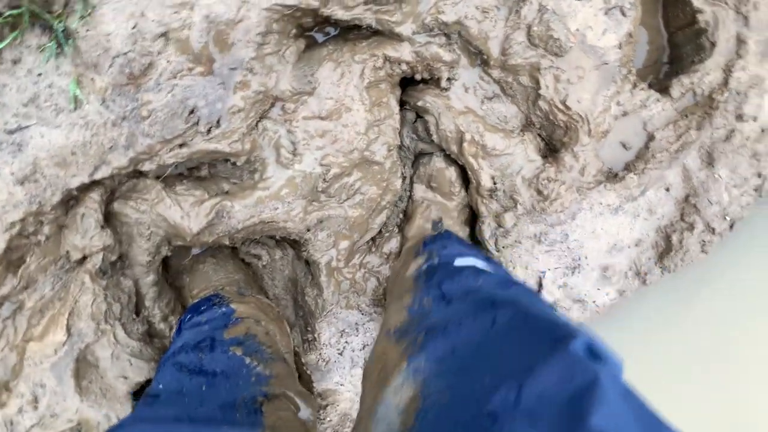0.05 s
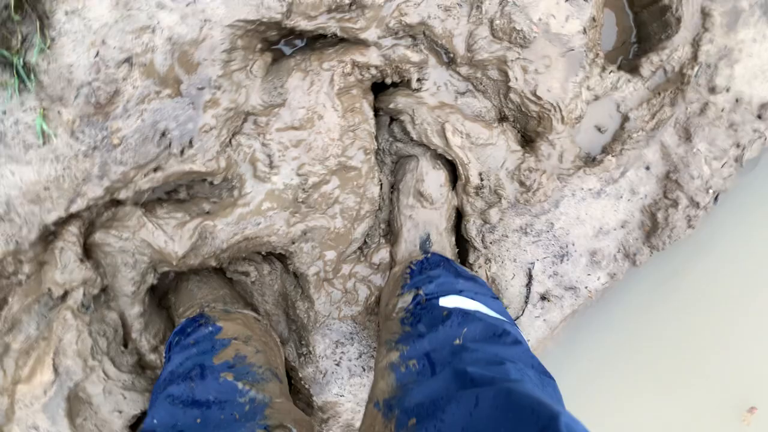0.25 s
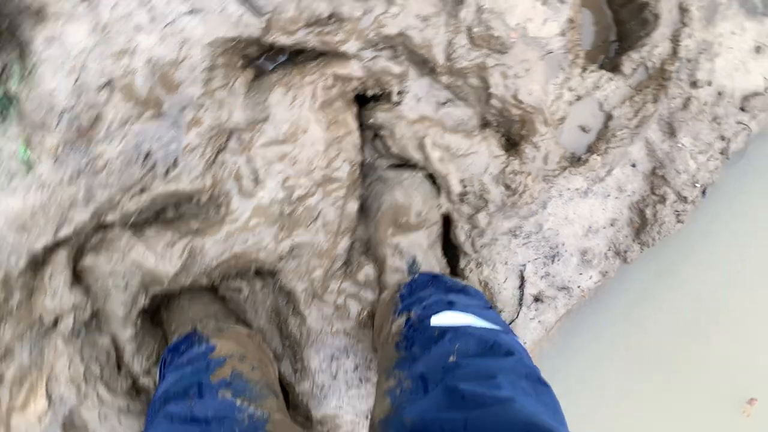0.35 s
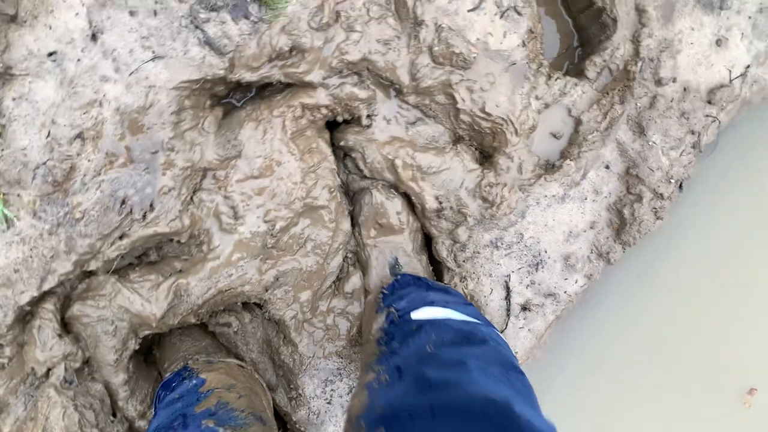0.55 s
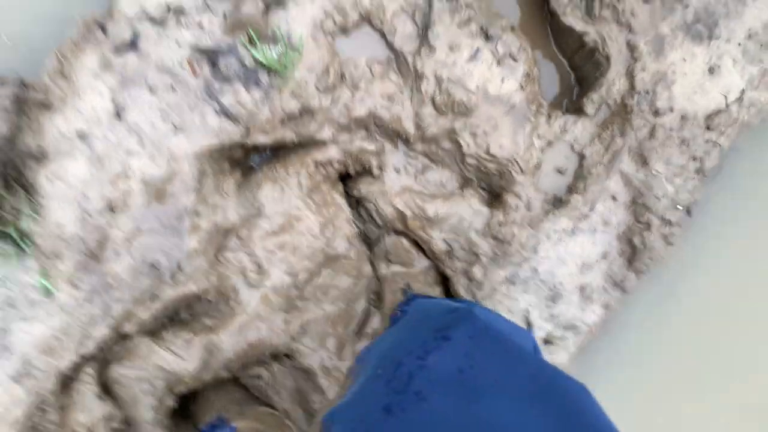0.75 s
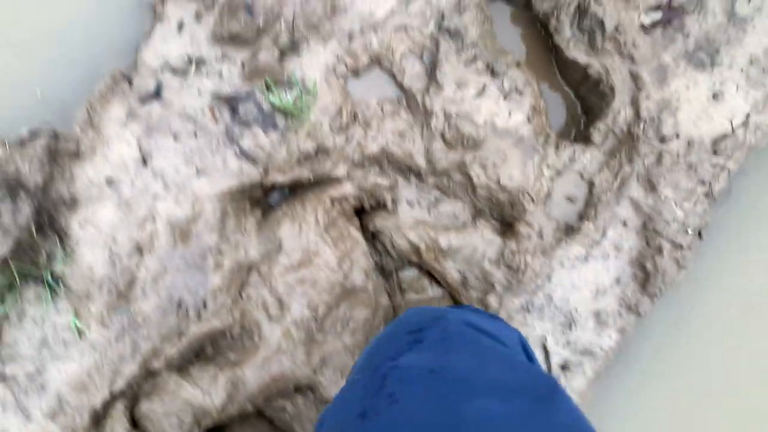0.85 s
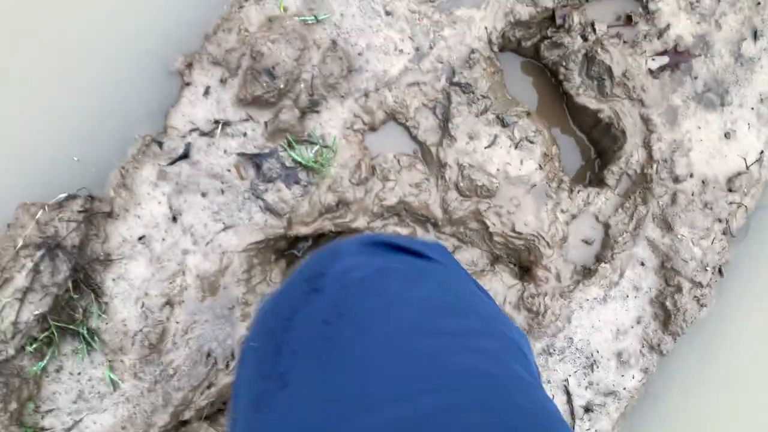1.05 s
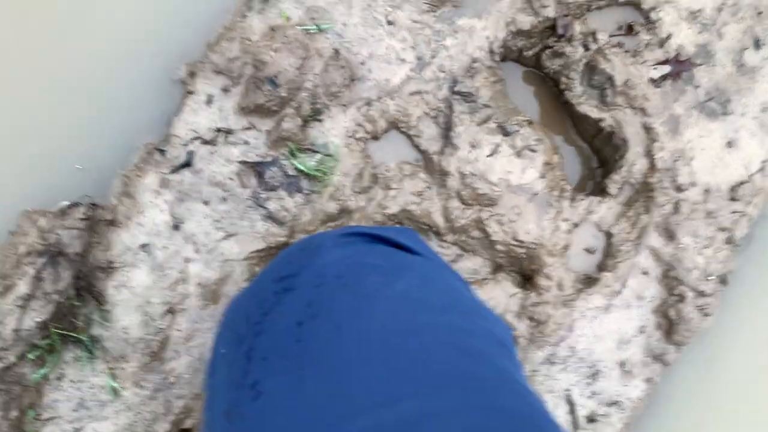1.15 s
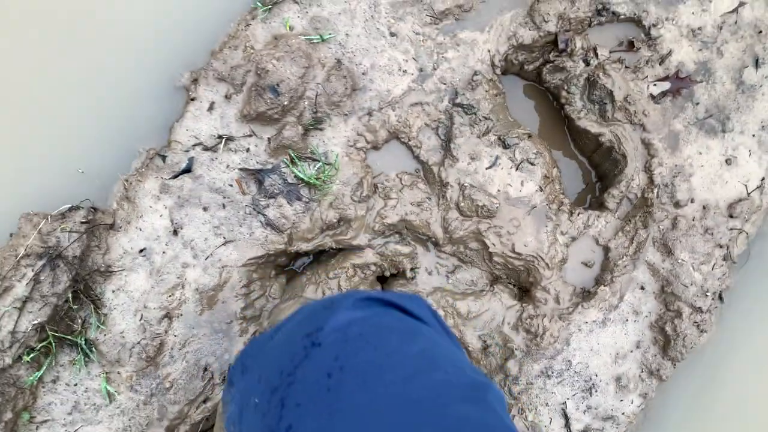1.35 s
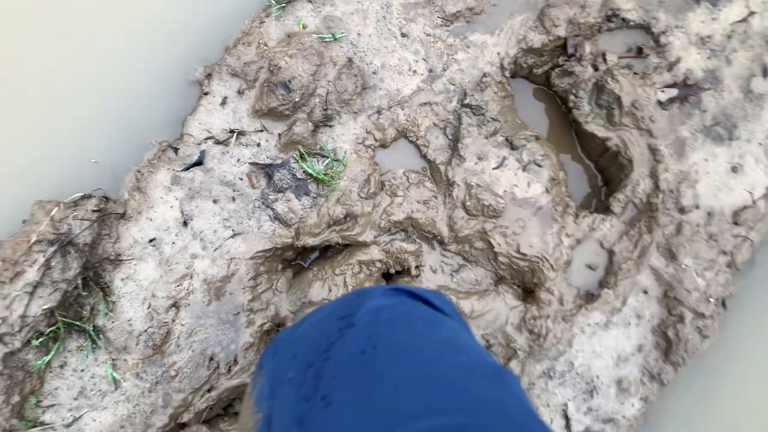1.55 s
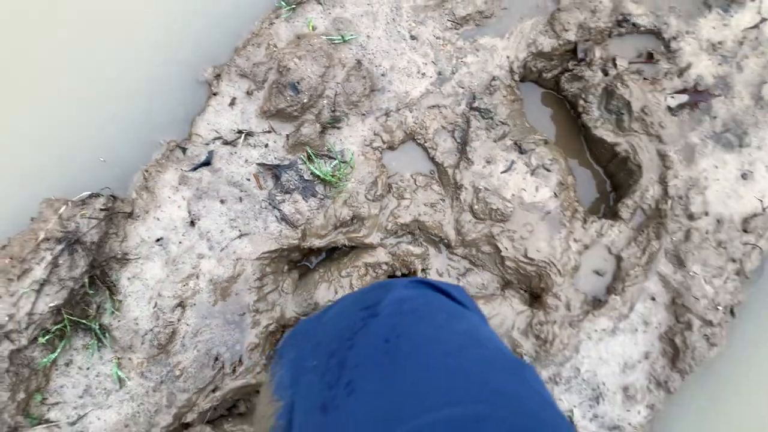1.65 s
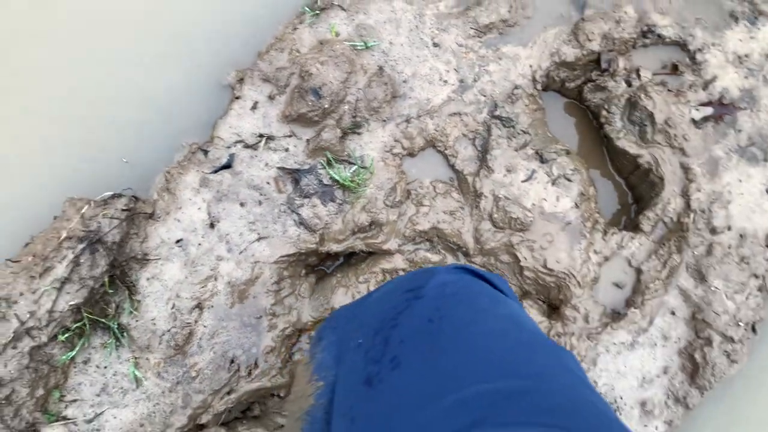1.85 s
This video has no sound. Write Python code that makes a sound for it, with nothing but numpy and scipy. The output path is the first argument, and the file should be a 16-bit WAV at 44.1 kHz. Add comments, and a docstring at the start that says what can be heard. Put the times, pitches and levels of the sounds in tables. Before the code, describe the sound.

A boot squelches through deep wet mud, close by outdoors. At about 0.35 seconds it tears free with a wet hiss, clicks and a thud. Waterproof trousers rustle as the leg swings, and around 0.8 to 0.9 seconds the boot squishes down with small gulps. From 1.2 to 1.5 seconds come dull thuds and wind buffets on the microphone. Tiny bubbles pop throughout over low rumble, fading by 1.9 seconds.

```python
"""Outdoors in deep wet mud: one step in rubber boots, close to a hand-held microphone.
One boot tears loose with a wet hiss of snapping mud threads, swings past and squelches down,
squeezing out slurry and gulps of air. The footfalls thud and air buffets the microphone.
Waterproof trousers rustle, small bubbles pop in the mud, and a faint hush lies far behind."""
import sys
import numpy as np
from scipy import signal
from scipy.fft import rfft, irfft
from scipy.io import wavfile
from scipy.ndimage import uniform_filter1d

SR = 44100
rng = np.random.default_rng(int(sys.argv[2]) if len(sys.argv) > 2 else 0)


def wav_out(sig):
    """Save sig, one row per channel (or a flat mono array), as 16-bit PCM at SR to the path in sys.argv[1]."""
    wavfile.write(sys.argv[1], SR, np.round(np.clip(np.atleast_2d(sig).T, -1, 1) * 32767).astype(np.int16))


N = 83790
T = np.arange(N) / SR
CUTOFF_HZ = 15450
MUD_GRAINS_PER_S, MUD_SPREAD_DB = 3000, 3.5


def from_db(db):
    """Decibels to gain."""
    return 10 ** (np.asarray(db) / 20)


def unit_power(x):
    """Scale to an RMS of one."""
    return x / np.sqrt(np.mean(x ** 2) + 1e-20)


def in_time(rows):
    """Read a (time, value) curve at every sample."""
    return np.interp(T, *np.transpose(rows))


def at_hz(points, hz):
    """Read a (frequency, value) curve on a log-frequency axis."""
    frequency, value = np.transpose(points)
    return np.interp(np.log(hz), np.log(frequency), value)


def pan(db):
    """Left and right gains for a level difference; negative leans right."""
    return from_db(np.array([[db], [-db]]) / 2)


def band(x, low_hz, high_hz, order=2):
    """Butterworth band-pass."""
    sos = signal.butter(order, [low_hz, min(high_hz, SR / 2 - 1)], "band", fs=SR, output="sos")
    return signal.sosfilt(sos, x + 1e-18)


def steady(x, span_s):
    """Even out the swells of a noise that are slower than the span."""
    power = np.abs(signal.hilbert(x)) ** 2 / 2
    return x / np.sqrt(uniform_filter1d(power, max(int(span_s * SR), 1)) + 1e-12)


def swell(peak_s, attack_s, release_s):
    """A rounded rise and fall about a peak."""
    width_s = np.where(T < peak_s, attack_s, release_s)
    return np.exp(-(np.abs(T - peak_s) / width_s) ** 2.6)


def grains(per_s=MUD_GRAINS_PER_S, spread_db=MUD_SPREAD_DB):
    """Four unrelated streams of tiny clicks of uneven size."""
    size = from_db(spread_db * np.minimum(rng.exponential(1, (2, 2, N)), 4))
    return size * rng.choice([-1, 1], (2, 2, N)) * (rng.random((2, 2, N)) < per_s / SR)


def coloured(streams, spectrum, direct):
    """Shape four streams into stereo by third octaves; direct sound is more alike in both channels."""
    # diffuse sound at the two microphone ports: (frequency [Hz], left-right likeness [0-1])
    likeness = [(100, 0.91), (250, 1), (700, 0.58), (1400, 0.12), (3000, 0.097), (10000, 0.093)]
    # lean of the stereo image: (frequency [Hz], left minus right [dB])
    balance = [(200, -6.5), (700, -1.5), (1400, -3.5), (3000, -2.5), (8000, -1.5)]
    edges_hz = 140 * 2 ** (np.arange(22) / 3)
    out = 0
    for k, (low, high) in enumerate(zip(edges_hz, edges_hz[1:])):
        mid, side = band(streams[k % 2], low, high, order=3)
        hz = np.sqrt(low * high)
        alike = np.clip(direct + (1 - direct) * at_hz(likeness, hz), 0, 1)
        pair = np.sqrt(1 + alike) * mid + np.sqrt(1 - alike) * side * [[1], [-1]]
        out = out + from_db(at_hz(spectrum, hz)) * pan(at_hz(balance, hz)) * pair
    return unit_power(out)


def from_left(pair, lag_s=0.00045, above_hz=1900):
    """Treble from the left reaches the right microphone port late."""
    hz = np.arange(N // 2 + 1) * SR / N
    delay = np.exp(-2j * np.pi * hz * lag_s * (hz > above_hz))
    return np.array([pair[0], irfft(rfft(pair[1]) * delay, N)])


def hush():
    """Smooth outdoor air, far from the microphone."""
    # colour of the air: (frequency [Hz], relative density [dB])
    spectrum = [(230, 15), (340, -6), (900, -1), (2000, -11), (4400, -17.5), (5500, -48), (8000, -27),
                (15000, -28)]
    # its slow fall and rise: (time [s], level [dB])
    levels = [(0, -55.5), (.7, -69.5), (1.3, -72), (1.6, -55.5), (1.9, -61)]
    air = coloured(rng.standard_normal((2, 2, N)), spectrum, direct=0.098)
    return from_db(in_time(levels)) * from_left(air)


def rumble(gain_db=3.5):
    """Low wind and handling noise on the microphone, the same in both channels."""
    # colour of the rumble: (frequency [Hz], relative density [dB])
    spectrum = [(20, -27.5), (35, -9.5), (50, 2), (75, -0.5), (110, -11), (170, -15.5), (250, -25.5),
                (340, -37.5), (600, -54.5)]
    # surges of wind and handling: (time [s], relative level [dB])
    levels = [(0, -52.5), (.2, -49.5), (.25, -40.5), (.32, -60), (.38, -33.5), (.45, -38), (.57, -36),
              (.62, -49), (.75, -46.5), (.83, -33.5), (.92, -33.5), (.96, -48.5), (1.02, -37), (1.16, -44),
              (1.27, -32), (1.46, -34), (1.53, -40), (1.57, -52.5), (1.61, -45.5), (1.75, -56),
              (1.785, -47), (1.9, -64.5)]
    hz = np.maximum(np.arange(N // 2 + 1) * SR / N, 1)
    noise = irfft(rfft(rng.standard_normal(N)) * from_db(at_hz(spectrum, hz)), N)
    return from_db(in_time(levels) + gain_db) * steady(band(noise, 21, 400), span_s=0.046)


def buffets(low_hz=104.5, attack_s=0.0072, release_s=0.0071, split_hz=410, side_db=-4.5):
    """Short eddies right at the microphone; above the split its two ports feel different ones."""
    # puffs of air: (start [s], length [s], level [dB], top edge [Hz])
    puffs = [(0.215, 0.022, -43, 258), (0.355, .022, -31.5, 464), (0.379, 0.04, -34, 291),
             (0.47, 0.02, -41.5, 340), (0.766, 0.048, -41, 345), (0.81, 0.12, -43.5, 250),
             (1.238, 0.011, -34.5, 320), (1.283, 0.0073, -32, 338), (1.337, 0.03, -29.5, 486),
             (1.37, 0.04, -23.5, 422), (1.455, 0.034, -30.5, 418), (1.487, 0.034, -34.5, 350)]
    treble_tilt = signal.butter(1, 150, fs=SR)
    out = 0
    for start, length, db, top_hz in puffs:
        rise = np.clip((T - start) / attack_s, 0, 1)
        fall = np.exp(-np.maximum(T - start - length, 0) / release_s)
        noise = band(rng.standard_normal((2, N)), low_hz, top_hz, order=4)
        eddy = steady(signal.lfilter(*treble_tilt, noise), span_s=0.016)
        out = out + from_db(db) * rise * fall * eddy
    mid, side = out
    return mid + from_db(side_db) * band(side, split_hz, 1800, order=8) * [[1], [-1]]


def rustle():
    """Fine crackling friction of waterproof trousers as the leg swings past the microphone."""
    # colour of the cloth: (frequency [Hz], relative density [dB])
    spectrum = [(200, -8.5), (420, 3), (800, 0), (1300, -4.5), (1900, -4), (3200, -10.5), (4400, -11.5),
                (5700, -14), (8300, -19), (11000, -27), (15000, -35)]
    # rubbing through the stride: (time [s], level [dB])
    levels = [(0, -56.5), (.28, -56.5), (.40, -52), (.48, -59.5), (.58, -57.5), (.62, -53), (.72, -51),
              (.79, -55), (.87, -43.5), (.95, -52), (1.03, -49), (1.16, -52), (1.25, -57), (1.40, -55),
              (1.52, -66.5), (1.82, -68.5), (1.9, -60)]
    cloth = coloured(grains(per_s=9000, spread_db=5.5), spectrum, direct=0.26)
    return from_db(in_time(levels)) * from_left(cloth)


def pops(chirp_per_s=5.8, clear_s=0.019, ring_db=3.9, splash_db=-5.5, splash_ratio=1.7):
    """Each bubble bursts with a rising ring and a splash about its pitch; longer ones ring clearer."""
    # small bubbles in the mud: (time [s], relative level [dB], starting pitch [Hz], 60 dB decay [s])
    bubbles = [(.076, -38, 1230, 0.012), (.249, -45, 800, 0.016), (.320, -39, 1270, 0.012),
               (.616, -43, 3120, 0.012), (.929, -38.5, 1780, 0.013), (1.374, -36, 628, 0.025),
               (1.4437, -43.5, 2080, 0.012), (1.566, -47.5, 798, 0.024)]
    out = 0
    for start, db, hz, t60 in bubbles:
        t = np.maximum(T - start, 0)
        decay = from_db(-60 * np.minimum(t / t60, 3)) * (T >= start)
        clear = np.tanh((t60 / clear_s) ** 2)
        ring = from_db(ring_db) * np.sin(2 * np.pi * hz * t * (1 + chirp_per_s * t)) * decay
        noise = band(rng.standard_normal(N) * decay, hz / splash_ratio, hz * splash_ratio, order=4)
        splash = from_db(splash_db) * noise * np.sqrt(SR / 3 / hz)  # equal power at any pitch
        out = out + from_db(db) * (clear * ring + np.sqrt(1 - clear ** 2) * splash)
    return out * pan(-1.4)


def snaps(edge_ratio=1.5):
    """A film of mud parts in one click; smaller films sound higher."""
    # parting films: (time [s], peak [dB], pitch [Hz])
    films = [(.0736, -41, 1660), (.3581, -28.5, 4600), (.4051, -43, 8000), (.4121, -35.5, 2770),
             (.4191, -37.5, 1730), (.7551, -48, 7240), (.8156, -35.5, 1900), (1.1738, -39, 2660),
             (1.3711, -38.5, 1850), (1.6021, -44.5, 2850), (1.7801, -55.5, 6500)]
    out = 0
    for start, db, hz in films:
        click = band(signal.unit_impulse(N, int(start * SR)), hz / edge_ratio, hz * edge_ratio, order=5)
        out = out + from_db(db) * click / np.abs(click).max()
    return out * pan(-2)


def thuds(sag_per_s=2.75):
    """Soft, heavy blows of boots and body: a few low cycles that swell, sag in pitch and die."""
    # blows: (start [s], peak [dB], starting pitch [Hz], rise [s])
    blows = [(0.215, -28, 126, 0.014), (0.366, -15.5, 109, 0.009), (0.478, -21, 77.7, 0.013),
             (0.513, -30, 185, 0.0019), (0.778, -18.5, 141, 0.008), (0.871, -22, 83, 0.0086),
             (0.923, -17.5, 132, 0.0057), (1.199, -23.5, 97.6, 0.015), (1.245, -19, 123, 0.0077),
             (1.309, -18, 87.5, 0.0074), (1.353, -16, 121, 0.0058), (1.394, -18.5, 153, 0.013),
             (1.493, -20.5, 168, 0.0087), (1.522, -21.5, 115.6, 0.0065)]
    out = 0
    for start, db, hz, rise_s in blows:
        t = np.maximum(T - start, 0)
        envelope = (t / rise_s * np.exp(1 - t / rise_s)) ** 2
        out = out + from_db(db) * envelope * np.sin(2 * np.pi * hz * t / (1 + sag_per_s * t))
    return out


def spray(envelope, db, low_hz=8040, sharpness=5.8):
    """A thin sizzle of the finest droplets, which fly only at the height of a spurt."""
    peak = envelope.max()
    fizz = unit_power(band(grains()[0], low_hz, CUTOFF_HZ, order=3))
    return peak * from_db(db) * (envelope / peak) ** sharpness * fizz


def slide():
    """The sole slides on as it sinks: one wet rasp that swells under the squelches."""
    # colour of the rasp: (frequency [Hz], relative density [dB])
    spectrum = [(2000, -3), (3300, -5), (4400, 6.5), (7000, 1), (10000, 2.5), (15000, -20)]
    envelope = from_db(-50.5) * swell(peak_s=0.885, attack_s=0.06, release_s=0.018)
    return envelope * coloured(grains(), spectrum, direct=0.28) + spray(envelope, db=-5)


def gulps(roughness=0.55, flutter_hz=450):
    """An air pocket rings briefly; its soft walls flap and its pitch glides as the boot reshapes it."""
    # air pockets: (peak time [s], level [dB], pitch at the peak [Hz], glide [Hz/s])
    pockets = [(.3415, -39, 4310, -45000), (.8325, -35, 1236, -8500), (.8715, -42, 1270, 10500),
               (.8812, -34.5, 1263, 42000), (.889, -43, 2287, 10000), (.8955, -39, 1320, 24000),
               (.9052, -42, 2354, -16000)]
    out = 0
    for peak_s, db, hz, glide in pockets:
        t = T - peak_s
        flapping = unit_power(band(rng.standard_normal(N), flutter_hz / 2, flutter_hz * 2))
        envelope = from_db(db) * swell(peak_s, attack_s=0.0045, release_s=0.004)
        ring = np.sin(2 * np.pi * (hz + glide * t / 2) * t)
        out = out + envelope * (1 + roughness * flapping) * ring
    return out * pan(-7.5)


def squelches():
    """Air and slurry squeeze out from under the sole in spurts of crackling froth."""
    # spurts: (peak time [s], level [dB], attack [s], release [s])
    spurts = [(0.83, -50.5, 0.016, 0.037), (0.882, -42, 0.0065, 0.013), (0.897, -39.5, 0.01, 0.0054)]
    # colour of the froth: (frequency [Hz], relative density [dB])
    spectrum = [(350, -7), (650, 7.5), (950, -6.5), (1280, 9), (1700, -6), (2400, 1), (3300, -15.5),
                (6000, -16), (15000, -40)]
    envelope = sum(from_db(db) * swell(peak_s, attack, release) for peak_s, db, attack, release in spurts)
    return envelope * coloured(grains(per_s=1200, spread_db=5.0), spectrum, direct=0.81)


def tears():
    """Mud threads snap in a dense, wet hiss as the boot comes free."""
    # pulls on the mud: (peak time [s], level [dB], attack [s], release [s])
    pulls = [(0.323, -54, 0.017, 0.01), (.342, -44, 0.0094, 0.021), (.359, -41.5, 0.011, 0.023),
             (0.413, -54.5, 0.015, 0.017), (1.372, -53.5, 0.011, 0.015)]
    # colour of the snapping threads: (frequency [Hz], relative density [dB])
    spectrum = [(400, -1.5), (600, 3.5), (1300, -3), (1900, -4.5), (2700, 2.5), (3200, -8), (4300, 4.5),
                (5600, -10), (8500, -6), (11000, -18.5), (16000, -25)]
    envelope = sum(from_db(db) * swell(peak_s, attack, release) for peak_s, db, attack, release in pulls)
    return envelope * coloured(grains(), spectrum, direct=0.48) + spray(envelope, db=-8)


def scene():
    """Close mud and cloth and distant air in stereo, over the centred low sounds."""
    mud = tears() + squelches() + gulps() + slide() + pops() + snaps()
    return mud + rustle() + hush() + thuds() + buffets() + rumble()


def record(dry):
    """The microphone port cuts two dips in the treble; the top is cut off."""
    # port dips: (frequency [Hz], width [Hz], gain [dB])
    dips = [(5500, 800, -11), (11750, 1300, -28)]
    for hz, width_hz, db in dips:
        notched = signal.lfilter(*signal.iirnotch(hz, hz / width_hz, fs=SR), dry)
        dry = notched + from_db(db) * (dry - notched)
    return signal.sosfilt(signal.ellip(10, .1, 80, CUTOFF_HZ, fs=SR, output="sos"), dry)


dry = scene()
out = record(dry)
wav_out(out)
```